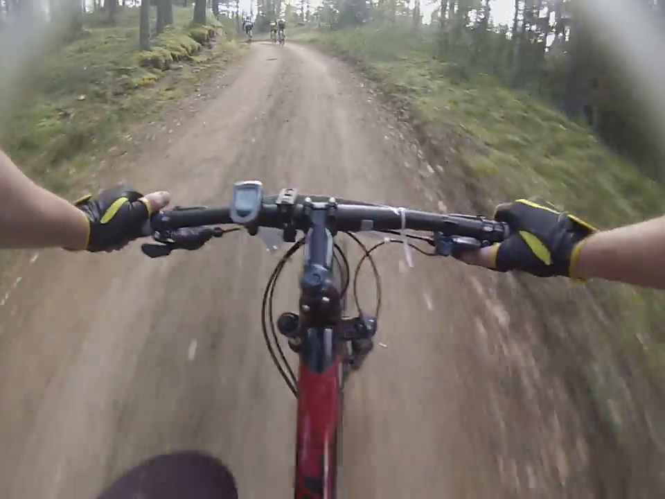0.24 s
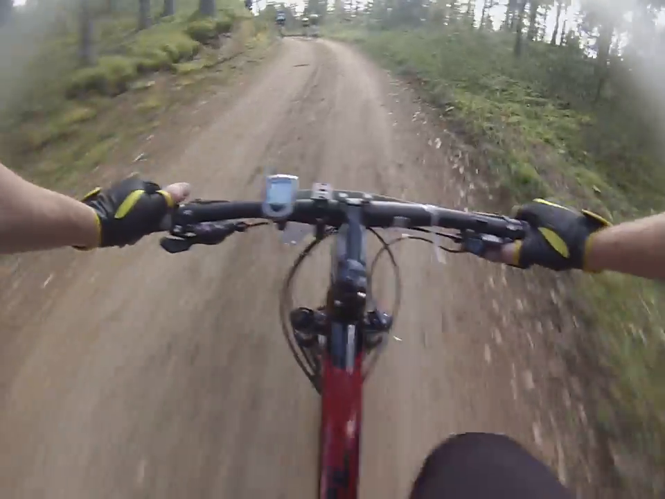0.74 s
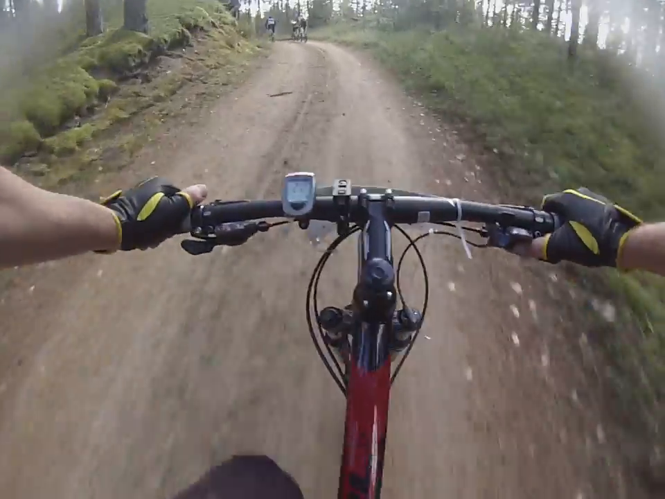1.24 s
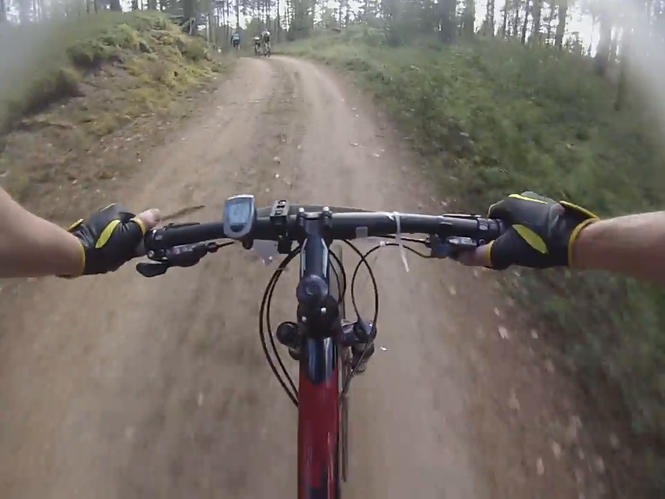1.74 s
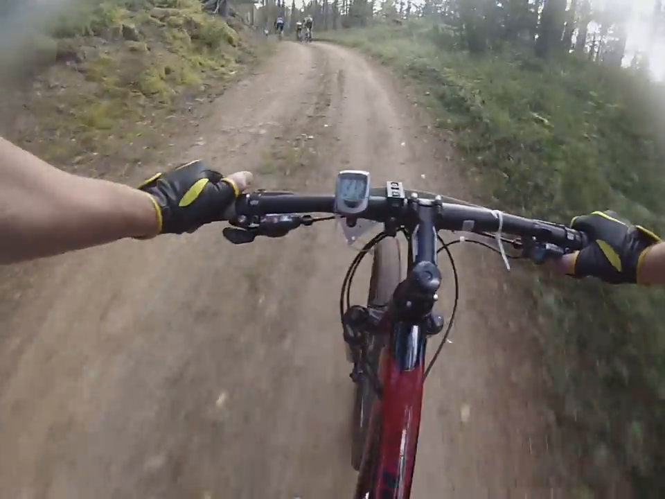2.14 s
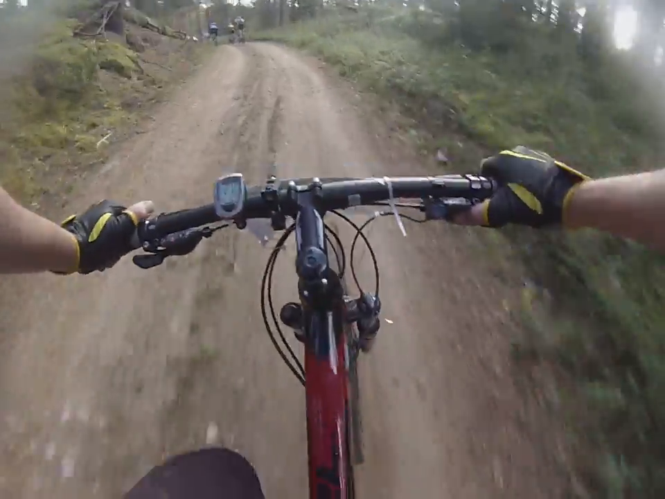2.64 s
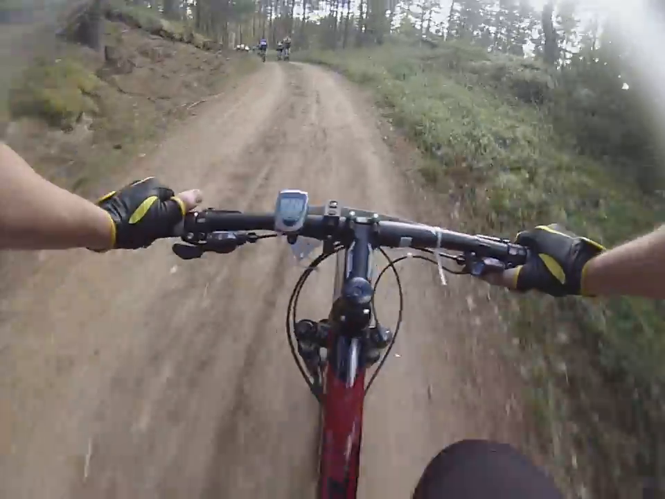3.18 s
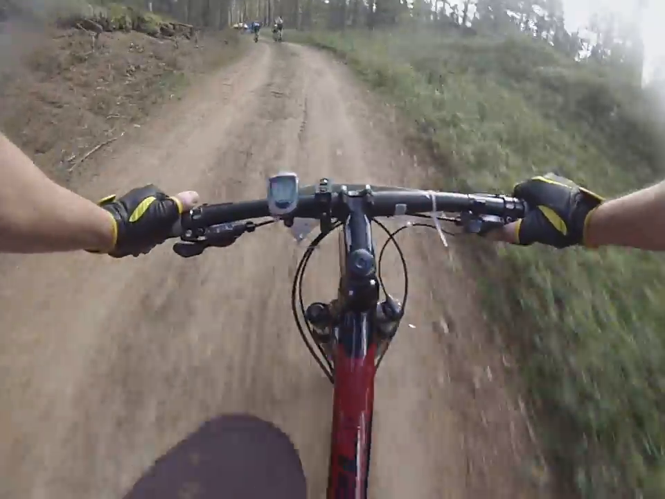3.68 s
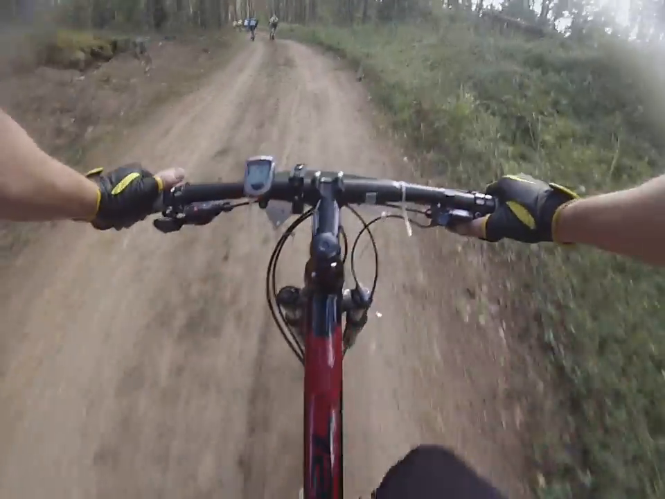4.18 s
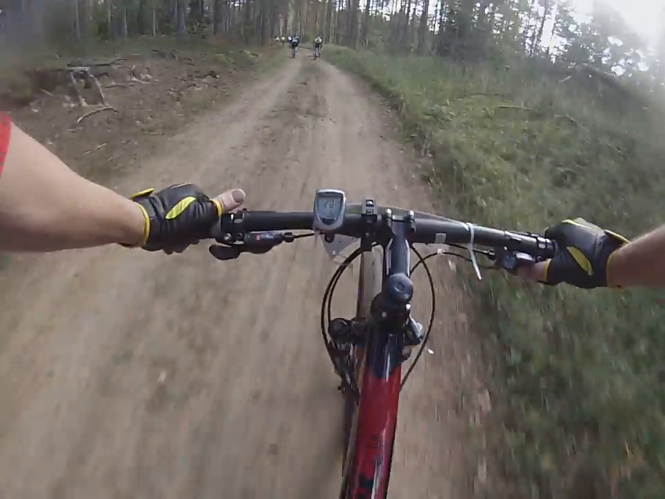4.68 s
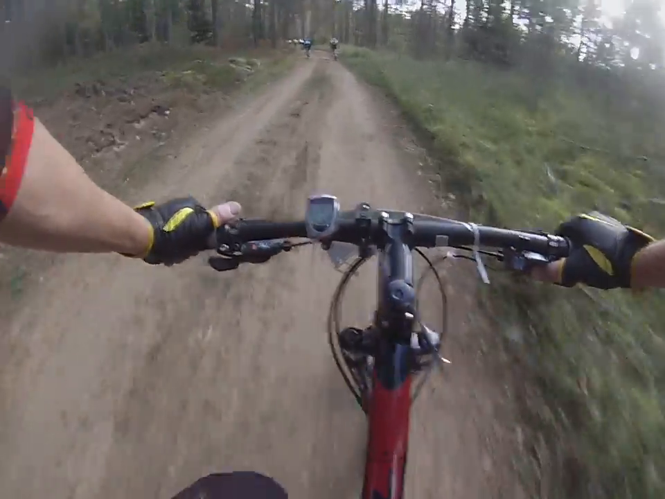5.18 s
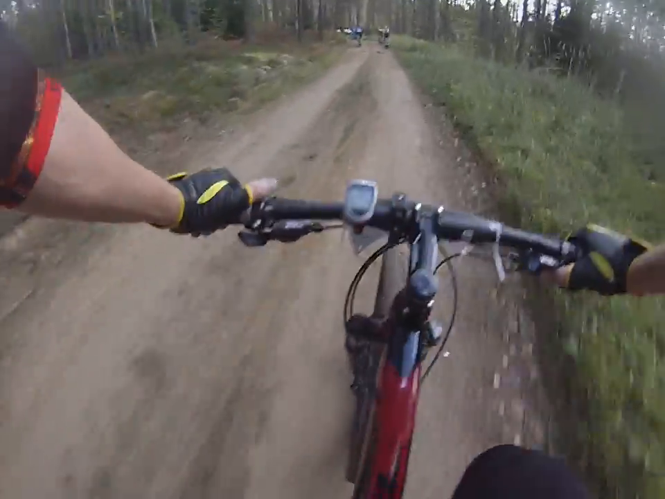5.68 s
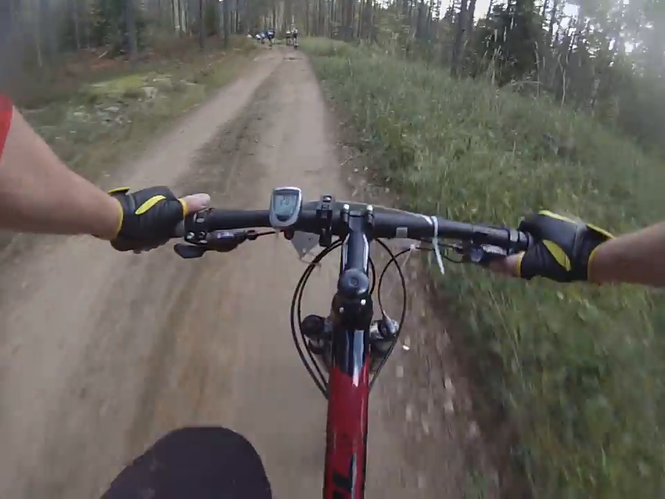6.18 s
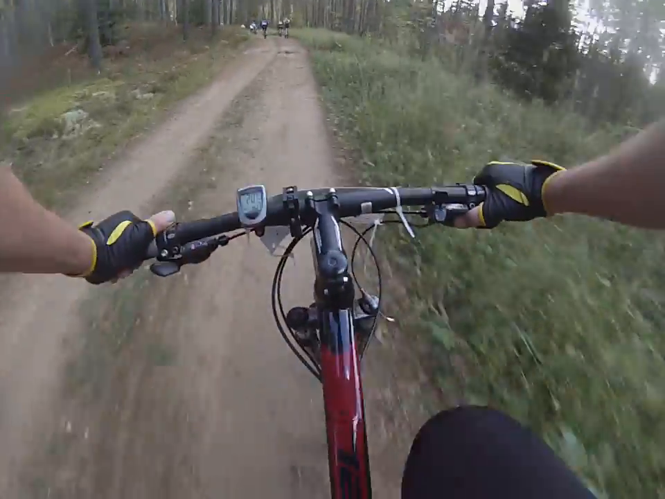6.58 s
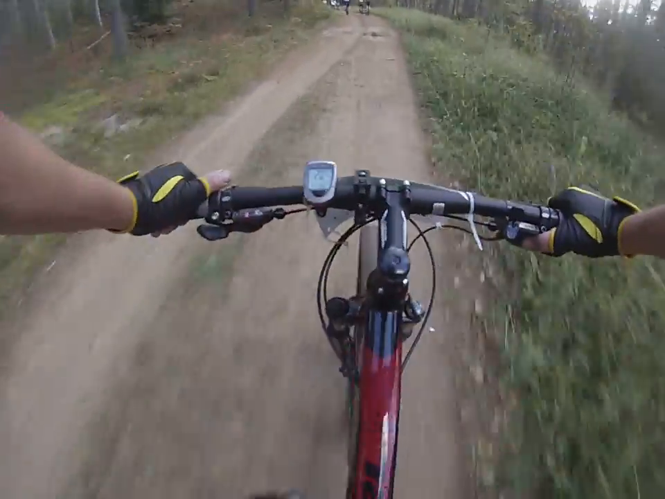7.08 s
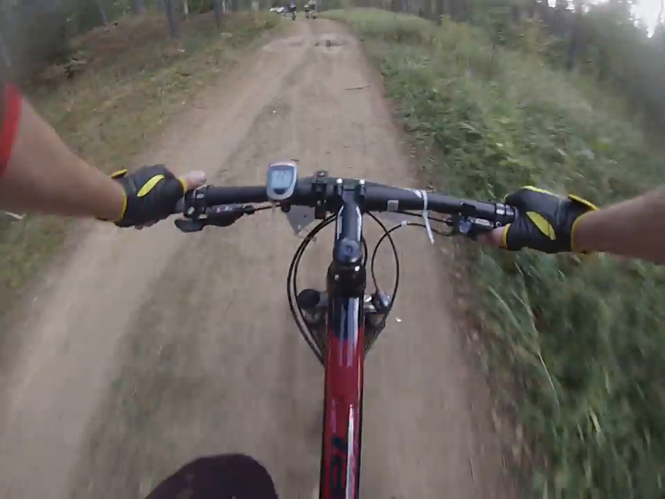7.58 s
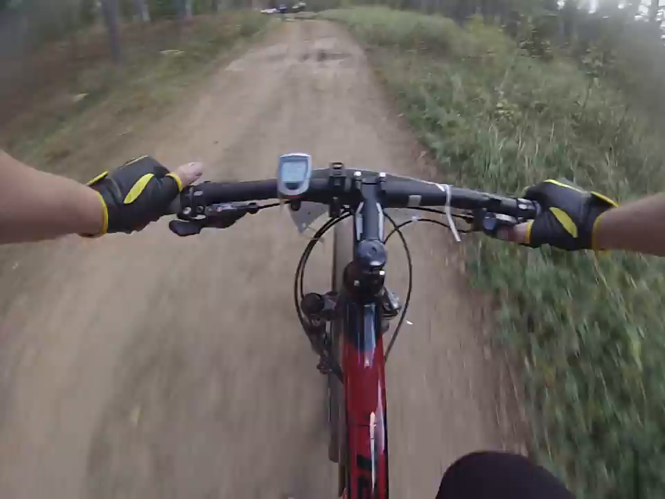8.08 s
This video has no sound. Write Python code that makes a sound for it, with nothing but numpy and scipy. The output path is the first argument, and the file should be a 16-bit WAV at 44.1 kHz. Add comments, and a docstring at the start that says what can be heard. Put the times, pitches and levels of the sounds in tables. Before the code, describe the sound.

A mountain bike rolls fast over dirt and gravel, with wind rumbling on the microphone and close plastic knocks over bumps.

```python
"""A dirt and gravel trail, from a fast mountain bike. The microphone is in a camera shut in a plastic
case on the rider's chest. Wind and jolts rumble in the microphone; tyre noise and grit come up from
the ground through the resonances of the case. Grit pings off the case and a loose metal part chatters.
Closest of all, the case knocks and ticks in its mount over the bumps."""
import sys
import numpy as np
from scipy import signal
from scipy.fft import rfft, irfft, next_fast_len
from scipy.io import wavfile
from scipy.ndimage import uniform_filter1d, map_coordinates

SR = 44100
rng = np.random.default_rng(int(sys.argv[2]) if len(sys.argv) > 2 else 0)


def digitize_waveform(pressure):
    """Quantize a signal to 16-bit integers and store it at the path in sys.argv[1].

    Rows of a 2-D input are taken as channels; values are limited to [-1, 1].
    """
    field = np.atleast_2d(pressure).T
    bounded = np.clip(field, -1, 1)
    quanta = np.round(bounded * 32767).astype(np.int16)
    wavfile.write(sys.argv[1], SR, quanta)


N = 367353


def amp(db):
    """Decibels to gain."""
    return 10 ** (np.asarray(db) / 20)


def unit(x):
    """x scaled to rms 1."""
    return x / np.sqrt(np.mean(x ** 2) + 1e-20)


def curves(rows):
    """Each column after the time, interpolated to one value per sample."""
    times, *columns = np.transpose(rows)
    return [np.interp(np.arange(N) / SR, times, column) for column in columns]


def wobble(per_s):
    """A smooth random curve through per_s points a second."""
    points = rng.standard_normal(int(N * per_s / SR) + 4)
    return map_coordinates(points, [np.arange(N) * per_s / SR])


def filtered(x, response):
    """x through a filter whose gain is response(hz)."""
    size = next_fast_len(N + SR // 2)
    return irfft(rfft(x, size) * response(np.fft.rfftfreq(size, 1 / SR)), size)[..., :N]


def coloured(x, spectrum):
    """x shaped by (frequency_hz, gain_db) points on a log axis, then scaled to rms 1."""
    points_hz, db = np.transpose(spectrum)
    return unit(filtered(x, lambda hz: amp(np.interp(np.log(hz + 1), np.log(points_hz + 1), db))))


def crackle(per_s, spread_db):
    """Random clicks of scattered sizes, rms 1."""
    hits = rng.random(N) < per_s / SR
    signs = rng.choice([-1, 1], N)
    sizes = amp(spread_db * np.clip(rng.standard_normal(N), -2, 2))
    return unit(hits * signs * sizes)


def wind_and_jolts():
    """Wind on the case and jolts through the chest strap: a deep throb and a lumpier buffet."""
    # wind at the microphone: time_s, throb_db, buffet_db
    wind = [(0.0, -26, -60), (0.3, -31, -54), (0.69, -37.5, -52), (1.28, -31.5, -53), (1.62, -30.5, -46),
            (1.97, -35, -58), (2.64, -34, -54.5), (3.09, -31.5, -53), (3.92, -34.5, -52),
            (4.71, -29, -49.5), (4.92, -34, -57.5), (5.24, -35, -51), (5.52, -37.5, -52.5),
            (5.75, -36.5, -56), (6.01, -32, -46.5), (6.4, -34, -51.5), (6.84, -33, -53), (7.21, -45, -58),
            (7.54, -45, -50.5), (7.75, -26, -52), (8.03, -36.5, -59), (8.33, -30.5, -54)]
    # jolts over bumps: start_s, length_s, throb_db, buffet_db
    jolts = [(-0.024, 0.03, -20, -43), (0.115, 0.052, -40, -58), (0.216, 0.17, -30.5, -51),
             (1.83, 0.044, -30, -44), (3.095, 0.11, -26, -61), (3.3, 0.034, -26.5, -39),
             (3.524, 0.04, -36.5, -73), (4.14, 0.044, -17.5, -43), (4.467, 0.25, -33, -52),
             (4.78, 0.03, -33, -41), (5.294, 0.058, -28.5, -63), (5.67, 0.096, -24.5, -69),
             (6.09, 0.065, -27.5, -51), (6.266, 0.093, -26, -53), (6.467, 0.15, -23, -46),
             (6.95, 0.056, -29, -53), (7.082, 0.28, -23, -57), (7.411, 0.27, -22, -43),
             (7.817, 0.056, -28, -60), (7.898, 0.1, -28.5, -57), (8.044, 0.19, -31, -54)]
    # spectra of the throb and the buffet: frequency_hz, gain_db
    throb_spectrum = [(1, -6), (7, -7.5), (15, 1), (25, 1.5), (33, -6.5), (45, -13), (70, -29.5),
                      (140, -37.5), (400, -120)]
    buffet_spectrum = [(20, -27), (45, -9), (75, -2.5), (130, -13), (220, -26), (400, -48), (1000, -120)]
    t = np.arange(N) / SR
    throb_db, buffet_db = curves(wind)
    throb_gain = amp(throb_db + 2.8 * wobble(9.2))
    buffet_gain = amp(buffet_db + 1.06 * wobble(8.5))
    for start, length, jolt_throb_db, jolt_buffet_db in jolts:
        outside_s = np.maximum(np.maximum(start - t, t - start - length), 0)
        jolt = amp(-20 * outside_s / 0.023)  # fades 20 dB in 23 ms on either side
        throb_gain += amp(jolt_throb_db) * jolt
        buffet_gain += amp(jolt_buffet_db) * jolt
    deep = coloured(rng.standard_normal(N), throb_spectrum)
    swell = np.sqrt(np.abs(uniform_filter1d(deep ** 2, size=SR // 8)) + 0.066)
    throb = unit(deep / swell)  # evened out, so it follows the jolts and not its own beating
    lumps = amp(2.3 * wobble(14) + 4.6 * wobble(35))
    buffet = coloured(lumps * rng.standard_normal(N), buffet_spectrum)
    return throb_gain * throb + buffet_gain * buffet


def tyres():
    """Knobbed tyres drone and roar below; small stones crackle in flurries; loose gravel rasps."""
    # rolling noise along the trail: time_s, roar_db, drone_db
    roll = [(0.0, -59, -59), (0.53, -57, -61), (0.88, -58, -61.5), (1.3, -58, -61), (2.51, -59, -61.5),
            (2.71, -57.5, -62.5), (3.04, -57, -61), (3.57, -59, -62.5), (4.06, -54, -59),
            (4.31, -54, -61.5), (4.78, -60.5, -59.5), (5.06, -58, -64), (5.19, -53.5, -60),
            (5.29, -52.5, -59.5), (5.71, -59, -63.5), (5.82, -59, -65.5), (6.29, -57, -61.5),
            (6.47, -52.5, -58.5), (6.63, -54.5, -58.5), (6.87, -57.5, -60), (7.1, -54, -58.5),
            (7.35, -55, -58.5), (7.82, -54, -57.5), (8.33, -55.5, -60.5)]
    # patches of loose gravel: peak_s, level_db, hiss_over_level_db, t60_s
    rasps = [(2.7187, -42.5, -20, 0.16), (4.145, -33, -11.5, 0.1), (4.27, -49, -14, 0.17),
             (5.141, -43.5, -20, 0.3), (5.2096, -28, -16, 0.053), (5.388, -32.5, -11, 0.2),
             (5.4644, -36, -5, 0.046), (5.6994, -34, -14.5, 0.48), (5.905, -36.5, -30, 0.17),
             (6.0057, -43.5, -17, 0.43), (6.3335, -41, -13, 0.15), (6.49, -35, -18, 0.21),
             (7.103, -29.5, -18, 0.089), (7.1463, -19.5, -33, 0.081), (7.1871, -37, -28, 0.19),
             (7.2594, -30, -27, 0.054), (7.484, -34, -20, 0.25), (7.5002, -18, -39, 0.064)]
    # roar, drone and grit hiss as heard through the case: frequency_hz, gain_db
    roar_spectrum = [(500, -28.5), (1000, -18.5), (1250, -6.5), (1480, -1), (1850, -7.5), (2200, -2),
                     (2500, -9.5), (2750, -10), (3400, -22.5), (5000, -20.5), (9000, -50)]
    drone_spectrum = [(80, -39), (160, -2), (240, -2.5), (310, -0.5), (450, -6.5), (700, -8), (1000, -10.5),
                      (1400, -15), (2500, -59)]
    hiss_spectrum = [(800, -35), (2500, -1), (3900, 0.5), (5000, -7.5), (6200, -6), (7800, -7.5),
                     (9000, -11), (12000, -15), (15000, -27)]
    t = np.arange(N) / SR
    roar_db, drone_db = curves(roll)
    roar_gain = amp(roar_db)
    hiss_gain = amp(-67 + 0.29 * (roar_db - roar_db.mean()))  # the hiss loosely follows the roar
    for peak_s, level_db, hiss_over_db, t60 in rasps:
        fade_s = np.where(t > peak_s, t60, 0.17 * t60)  # quick rise, slow fall
        rasp = amp(level_db - 12 - 60 * np.abs(t - peak_s) / fade_s)  # rms 12 dB under the level
        roar_gain += rasp
        hiss_gain += amp(hiss_over_db) * rasp
    flurry = wobble(14)
    stones = crackle(500 * amp(4 * flurry), spread_db=7.0)
    roar = amp(0.48 * flurry + 1.96 * wobble(50)) * rng.standard_normal(N) + 0.33 * stones
    hiss = amp(0.73 * flurry) * rng.standard_normal(N) + 0.25 * stones + 0.3 * crackle(90, spread_db=6)
    rasp_lift = (roar_gain / amp(roar_db)) ** 0.64
    drone_gain = rasp_lift * amp(drone_db + 1.57 * wobble(22))
    drone = drone_gain * coloured(rng.standard_normal(N), drone_spectrum)
    return roar_gain * coloured(roar, roar_spectrum) + hiss_gain * coloured(hiss, hiss_spectrum) + drone


def grit_pings():
    """Tiny hard grains hit the case, each a bright spit of noise."""
    # grains on the case: peak_s, level_db
    grains = [(0.0997, -53), (0.9273, -53), (1.475, -54), (2.2944, -60), (3.3244, -50), (4.2224, -43),
              (5.2574, -60), (5.3138, -60), (5.383, -47), (5.4174, -46), (5.4634, -50), (5.5172, -40.5),
              (6.0253, -40), (6.7456, -42), (6.911, -43), (7.1856, -52), (7.488, -49)]
    # spectrum of a ping: frequency_hz, gain_db
    spectrum = [(3000, -28), (5500, -6), (7500, 3), (11000, -3), (15000, -13)]
    rise_s, t60_s = 0.001, 0.0036
    t = np.arange(N) / SR
    envelope = sum(amp(db - 4 - 60 * np.abs(t - peak_s) / np.where(t > peak_s, t60_s, rise_s))
                   for peak_s, db in grains)
    return envelope * coloured(rng.standard_normal(N), spectrum)


def metal_chatter():
    """Dense small contacts keep the modes of a loose metal part ringing."""
    # bursts of shaking: start_s, level_db, t60_s
    bursts = [(7.142, -31.5, 0.073), (7.483, -43, .04), (7.499, -35.5, 0.052)]
    # modes of the part: pitch_hz, relative_db, t60_s
    modes = [(2624, 5.5, 0.043), (5180, -9, .03), (7260, -16, .02)]
    t = np.arange(N) / SR
    ring_t = t[:SR // 10]
    contacts = crackle(1500, spread_db=3)
    shake = sum((t > start) * amp(db - 60 * np.abs(t - start) / t60) for start, db, t60 in bursts)
    ring = sum(amp(db - 60 * ring_t / t60) * np.sin(2 * np.pi * hz * ring_t) for hz, db, t60 in modes)
    return signal.fftconvolve(shake * contacts, ring / np.linalg.norm(ring))[:N]


def struck(modes, blow, t, contact_s):
    """A blow rings decaying modes, varied in strength and pitch; contact_s rounds the start. Peak 1."""
    ring = 0
    for hz, db, t60 in modes:
        decay = amp(db + 2.5 * rng.standard_normal() - 60 * t / t60)
        pitch_hz = hz * (1 + 0.043 * rng.standard_normal())
        ring += decay * np.sin(2 * np.pi * pitch_hz * t)
    onset = 1 - np.exp(-(t / contact_s) ** 2)
    sound = signal.fftconvolve(blow, ring * onset)[:len(t)]
    return sound / np.abs(sound).max()


def case_hits(hits):
    """The case hits its mount: a light first touch, the blow, a rebound 2 ms later, a dying rattle."""
    # modes of the case in four families, low to high: pitch_hz, relative_db, t60_s
    modes = {"thud": [(200, 3, 0.0093), (319, 9.5, 0.0074), (502, 14, 0.003), (843, -3, 0.015)],
             "ring": [(1108, -0.5, 0.005), (1391, 9, 0.0084), (1522, -1, 0.012)],
             "second": [(2134, 0.5, 0.015), (2230, 4, 0.0063), (2589, 5, 0.0095), (3040, -8.5, 0.0043)],
             "snap": [(3840, 4, 0.007), (4630, 3.5, 0.0068), (5360, 10.5, 0.002), (6220, -9, 0.0052),
             (7500, 1, 0.0059), (8200, -8, 0.0017), (9200, -13, 0.0017), (10400, -16, 0.002),
             (13000, -29, .003)]}
    rattle_t60_s = 0.011
    lead, rebound = round(0.0009 * SR), round(0.0021 * SR)
    track, t = np.zeros(N + SR), np.arange(SR // 12) / SR
    for start, thud_db, ring_db, second_ring_db, snap_db in hits:
        blow = 0.32 * rng.standard_normal(len(t)) * amp(-60 * t / rattle_t60_s)
        blow[[0, lead, lead + rebound]] += 0.25, 1, 0.5
        hit = (amp(thud_db) * struck(modes["thud"], blow, t, contact_s=0.0014)
               + amp(ring_db) * struck(modes["ring"], blow, t, contact_s=0.0007)
               + amp(second_ring_db) * struck(modes["second"], blow, t, contact_s=0.00039)
               + amp(snap_db) * struck(modes["snap"], blow, t, contact_s=0.0001))
        track[round(start * SR) - lead:][:len(t)] += hit
    return track[:N]


def case_ticks():
    """Light ticks hardly move the low modes of the case; fainter ones fall at random."""
    # light contacts in the mount: start_s, ring_db, second_ring_over_ring_db, snap_over_ring_db
    ticks = [(0.654, -39.5, -4, -11), (0.72, -48.5, -8, 5.5), (0.927, -54.5, 10.5, 5),
             (1.116, -30.5, 5.5, -9), (1.414, -40.5, -3, -12), (1.506, -29.5, 4.5, -10),
             (2.288, -35.5, -1, -12), (2.312, -55.5, 19.5, -1), (2.705, -32.5, -7, -26),
             (2.719, -44, 7, -13), (2.884, -34, -8, -19), (3.113, -39, 0, -6), (3.147, -29, 2, -4),
             (3.74, -36.5, 8, -8), (4.035, -41, -17, -16), (4.2245, -45.5, 7, 1), (4.7476, -36.5, 16, 3),
             (4.76, -33, -2, -12), (4.770, -40, -3, -14), (5.195, -27, -1.5, -20), (5.228, -34, 4, -8),
             (5.315, -41.5, 5, -1), (5.384, -50, -1, 5), (5.404, -31, -2, -7), (5.449, -24.5, -1, -15),
             (5.518, -44, -3, -2), (5.581, -35.5, -17, -13), (5.776, -29.5, -0.5, -13),
             (5.949, -36.5, 2, -16), (6.026, -39, 1, -2.5), (6.108, -32.5, -12, -18),
             (6.7474, -32, 6, -2.5), (6.798, -43, 7.5, -7), (6.913, -41, 11.5, 7.5),
             (6.967, -36.5, -30, -19), (7.0912, -33, 6.5, -7), (7.187, -48, 5, 13),
             (7.2533, -23, 1.5, -7.5), (7.378, -32, -10, -16), (7.469, -30, -1.5, -11),
             (7.86, -38, -8, -15), (7.894, -35, -10, -23), (8.003, -42, 6, -11), (8.115, -35.5, -12, -18),
             (8.161, -31.5, 4, -20), (8.172, -41.5, 7, -18), (8.1821, -29.5, -2, -19)]
    faint_per_s, thud_over_ring_db = 4, -26.5
    draws = rng.random((round(faint_per_s * N / SR), 4))
    faint = [(0.01 + when * (N / SR - 0.01), -47.5 + 8 * force, 16 * second - 12, -6 - 14 * dullness)
             for when, force, second, dullness in draws]
    return case_hits([(start, db + thud_over_ring_db, db, db + second, db + snap)
                      for start, db, second, snap in ticks + faint])


def case_knocks():
    """Heavy knocks right at the microphone: the harder the contact, the more snap and second ring."""
    # heavy contacts in the mount: start_s, ring_db, thud_over_ring_db, snap_over_ring_db
    knocks = [(0.023, -16, -4, -9), (0.818, -28, 1, -41), (1.5196, -25, 0.5, -14), (2.2136, -25.5, 2, -31),
              (2.3, -43.5, 11.5, -15), (2.397, -28.5, -2.5, -39), (3.1347, -15.5, -7, -10.5),
              (3.7217, -22.5, -0.5, -34), (3.885, -27.5, 0.5, -45), (4.064, -29.5, 1, -34),
              (4.149, -26, -10, -37), (4.5325, -22.5, -0.5, -25), (6.1149, -30, 5.5, -30),
              (6.6068, -21, -3.5, -27), (6.714, -41, 8.5, -15), (6.7778, -33.5, -2.5, -31),
              (7.2792, -16, -6, -9), (7.5892, -34.5, -4, -36), (7.9706, -16.5, -10, -37)]
    second_ring_lift_db, follows_snap = 2.5, 0.31
    return case_hits([(start, db + thud, db, db + second_ring_lift_db + follows_snap * snap, db + snap)
                      for start, db, thud, snap in knocks])


def scene():
    """Everything reaches the one microphone through the case."""
    return (wind_and_jolts() + tyres() + case_knocks() + case_ticks()
            + grit_pings() + metal_chatter())[None]


def record(dry):
    """The camera keeps nothing above its band limit."""
    limit_hz = 15200
    return filtered(dry, lambda hz: hz < limit_hz)


dry = scene()
out = record(dry)
digitize_waveform(out)
```